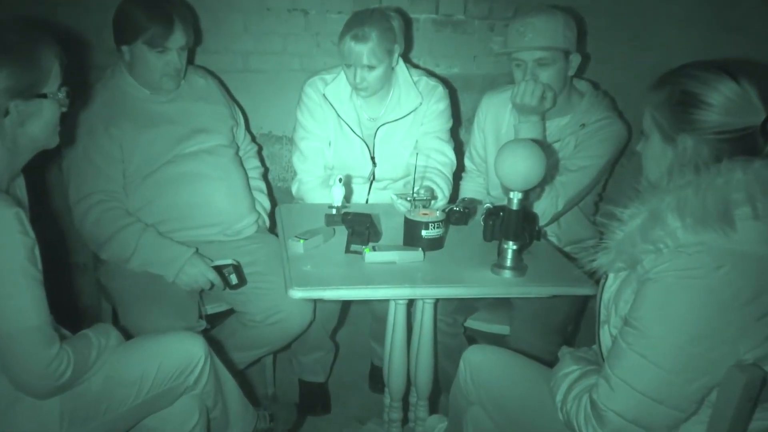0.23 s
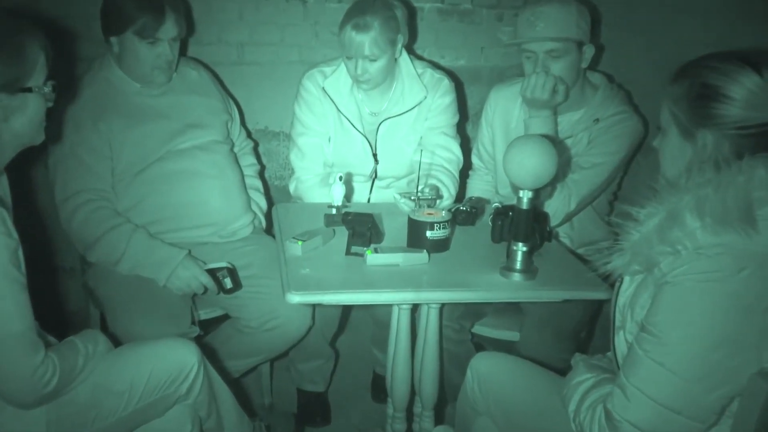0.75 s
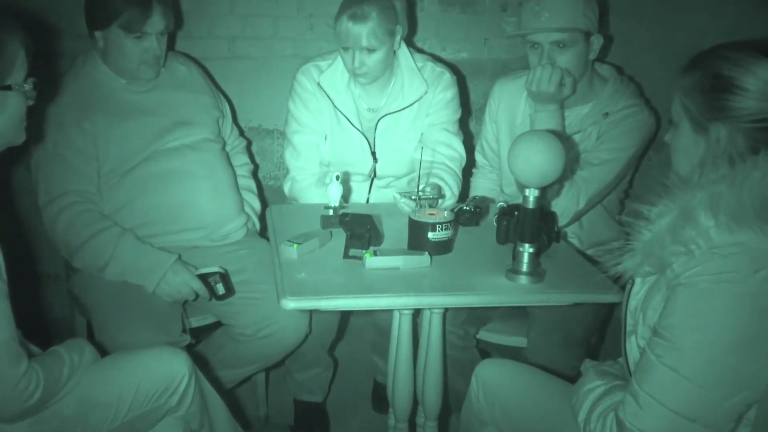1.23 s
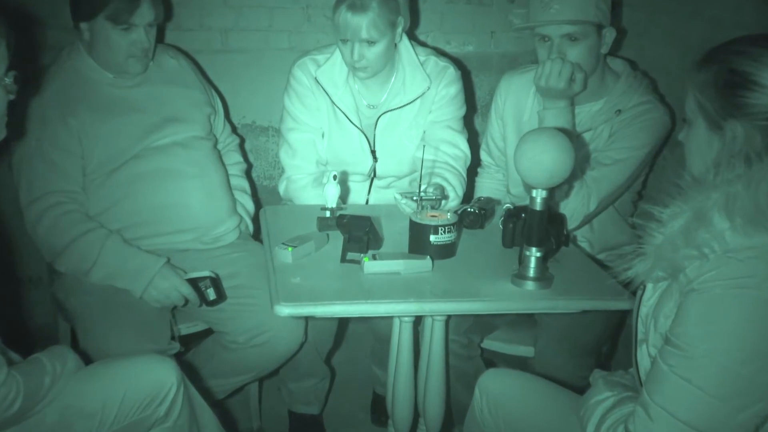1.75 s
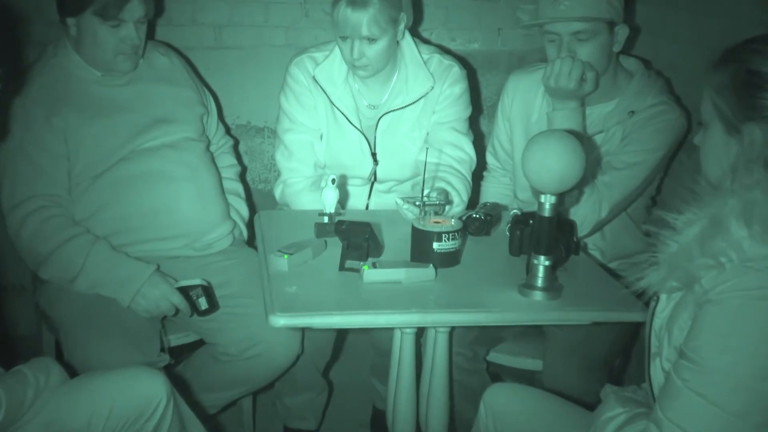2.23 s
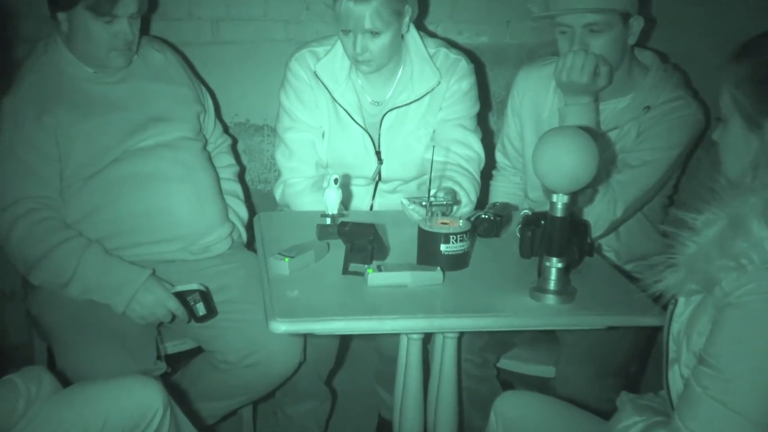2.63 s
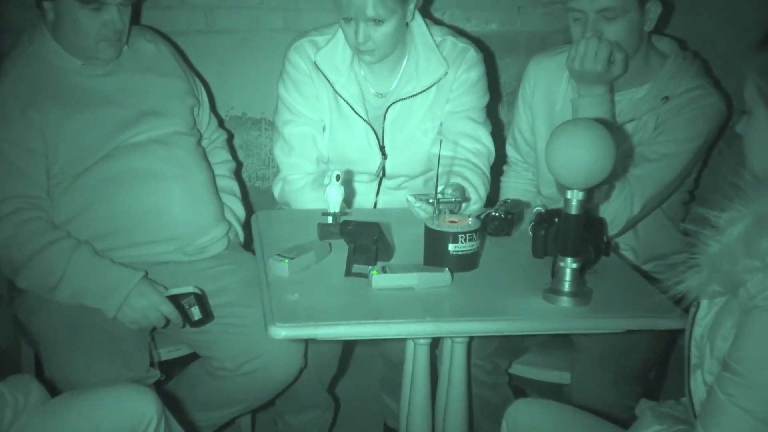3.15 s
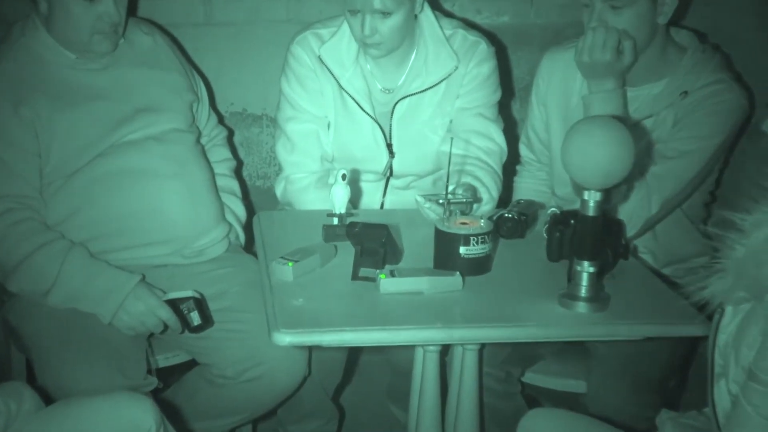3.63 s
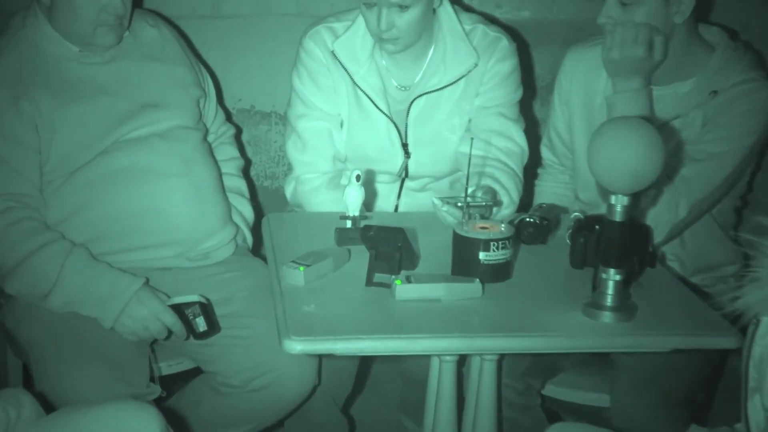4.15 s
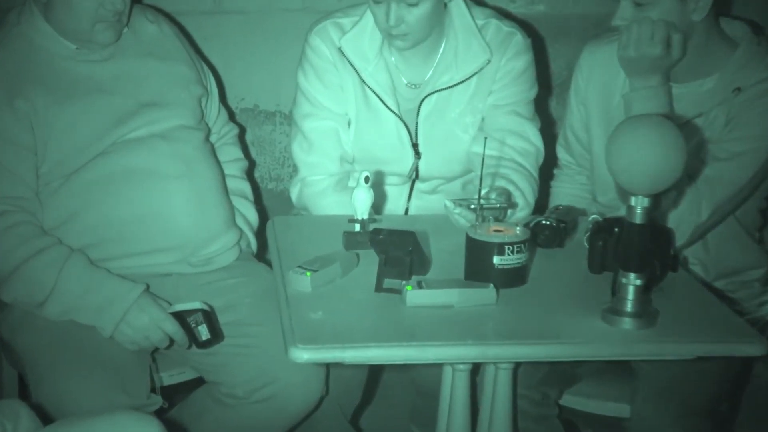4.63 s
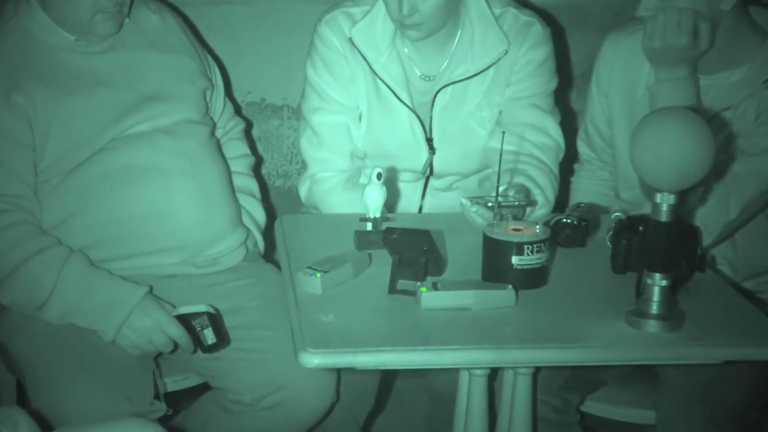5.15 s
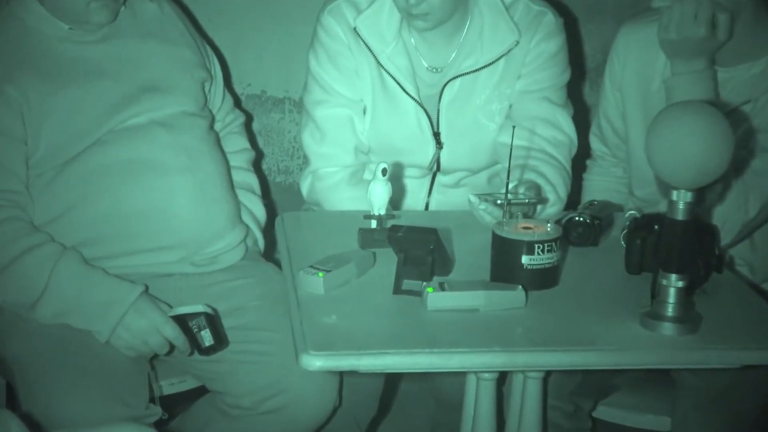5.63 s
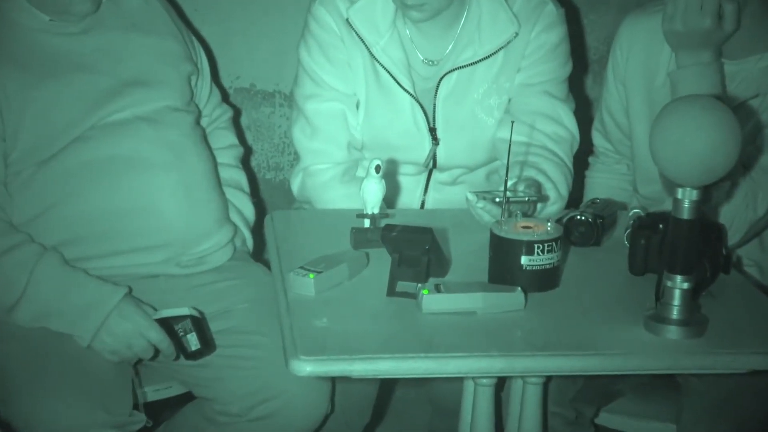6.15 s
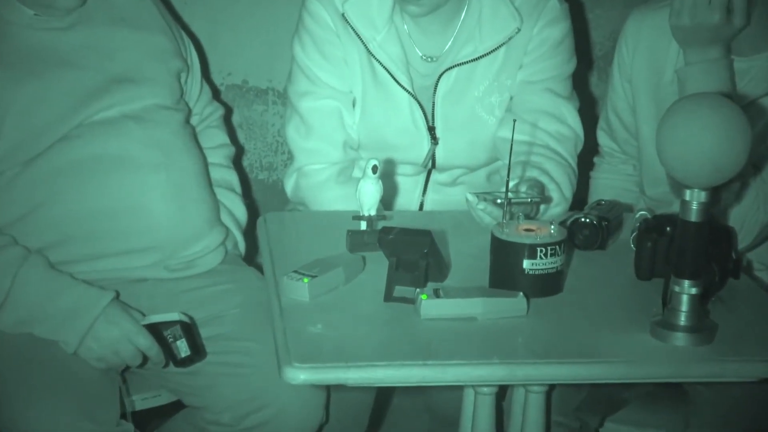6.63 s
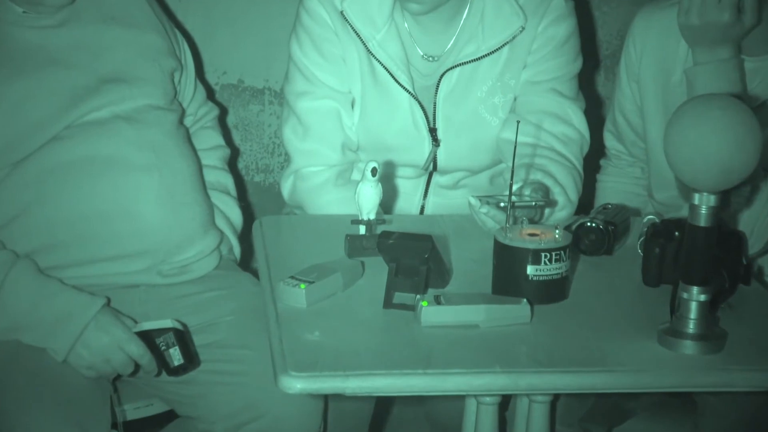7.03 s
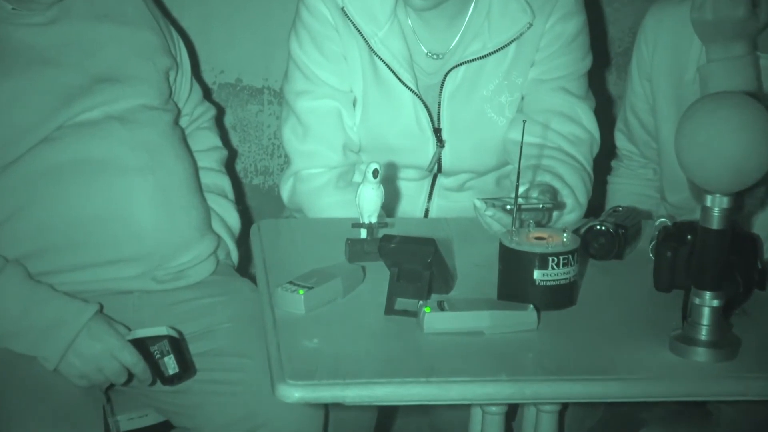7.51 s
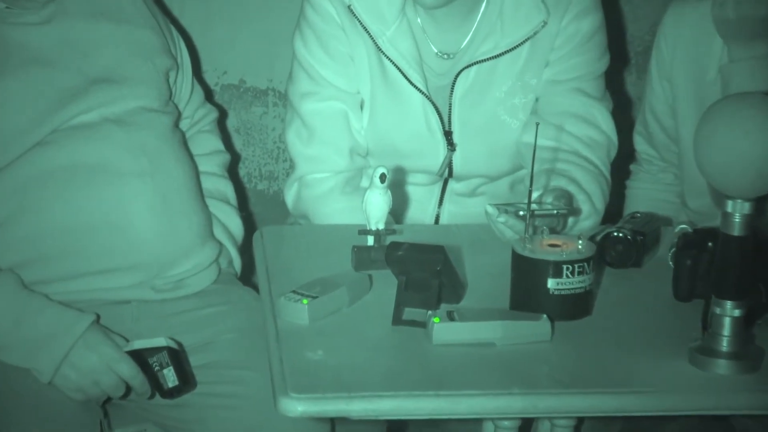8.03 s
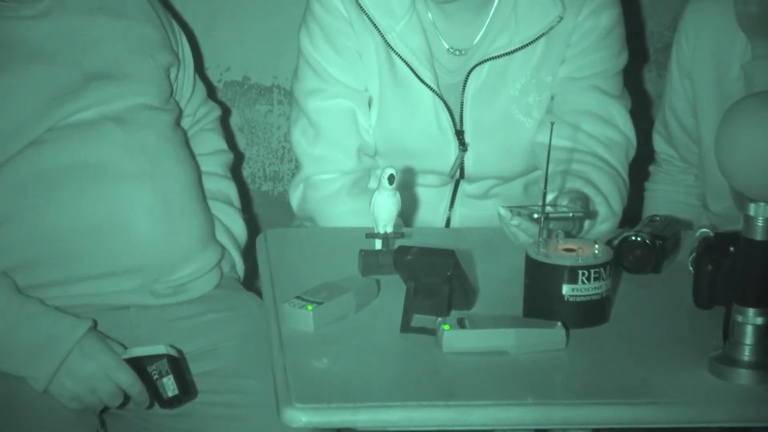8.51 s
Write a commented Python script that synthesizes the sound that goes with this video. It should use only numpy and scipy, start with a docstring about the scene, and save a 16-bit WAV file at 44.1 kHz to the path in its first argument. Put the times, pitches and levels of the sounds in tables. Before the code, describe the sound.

Low hum, rumble and thin hiss fill a small room, broken by a brief descending squeak and a single sharp click.

```python
"""Click in a quiet cellar

Mains hum and a distant motor drone sit on a low rumble that gathers in the room's modes, under thin
microphone hiss. Something small sticks and slips in one falling squeak, then a sharp plastic click
snaps close by. These and a few faint ticks echo off the near walls; a sleeve brushes softly."""
import sys
import numpy as np
from scipy import signal
from scipy.fft import rfft, irfft
from scipy.io import wavfile

SR = 44100
rng = np.random.default_rng(int(sys.argv[2]) if len(sys.argv) > 2 else 0)


def to_wav(sig):
    """Store sig (one row per channel, or 1-D mono) as 16-bit WAV at the path in sys.argv[1].

    Samples outside -1..1 are clipped; the rate is SR.
    """
    pcm = np.clip(np.atleast_2d(sig), -1, 1) * 32767
    pcm = np.round(pcm).astype(np.int16)
    wavfile.write(sys.argv[1], SR, pcm.T)  # frames by channels


N = 387013

# Stereo width of the air, nearly mono in the bass: freq_hz, side_minus_mid_db
STEREO_WIDTH = [(100, -63), (150, -47), (190, -33), (225, -27), (260, -18), (320, -16.5), (450, -9),
                (700, -8.5), (1150, -5.5), (1500, -1), (3000, -0.4), (6000, -4.5), (10000, -7),
                (13000, -25)]
# Colour of the microphone hiss: freq_hz, density_db_per_hz
HISS_SPECTRUM = [(100, -112), (3000, -112), (6000, -112.5), (11000, -114), (15500, -116.5)]
# Slow fader ride on the hiss: time_s, gain_db
HISS_RIDE = [(0, 0.5), (1, -0.3), (4, 0.5), (6.3, -1.2), (7.4, -2), (8.78, -3)]
# Rumble floor between the room modes: freq_hz, density_db_per_hz
RUMBLE_SPECTRUM = [(5, -99), (20, -93), (55, -75), (82, -84), (125, -69), (170, -73.5), (240, -77),
                   (275, -81), (360, -85), (450, -90), (850, -90.5), (1000, -99), (1700, -103),
                   (3000, -114), (9000, -130)]
# Room modes that the rumble excites: centre_hz, half_width_hz, peak_db_per_hz
ROOM_RESONANCES = [(12.8, 9, -68.5), (65.6, 2.1, -59.5), (101.4, 2.9, -59), (108.8, 5.2, -57),
                   (143.7, 5.8, -66.5), (181, 5.8, -71.5), (315.7, 14.3, -79.5), (543.4, 25, -87.5),
                   (704, 18, -88.5), (1114, 97, -93), (1194, 39, -95.5)]
# Slow swell shared by rumble and hum: time_s, gain_db
BED_SWELL = [(0, 2.5), (1.2, 0), (2.1, 1), (4.3, 0.44), (5.8, 0.4), (6.3, -0.65), (7.4, -1), (8.78, -3)]
# Steady machinery tones and a thin electronic whine: pitch_hz, level_db
MACHINE_TONES = [(41.7, -57), (160.8, -59), (199.5, -58.5), (220.7, -53.5), (242.2, -68.5), (277.9, -72.5),
                 (299.1, -70.5), (384.6, -70.5), (528, -77.5), (2950, -90.5)]
# Decay of the wall reflections: freq_hz, t60_s
WALL_DECAY = [(200, 0.23), (1500, 0.18), (6000, 0.13), (14000, 0.053)]
# Colour of rubbing cloth: freq_hz, relative_db
CLOTH_COLOUR = [(700, -7), (2000, 7), (3500, 1.5), (7000, 3), (11000, -3.5), (15500, -11)]
# Strokes of a sleeve against cloth: start_s, rise_s, fade_s, peak_db
SLEEVE_STROKES = [(4.32, 0.057, 0.16, -64.5), (4.44, 0.19, 0.1, -64), (6.78, 0.37, 0.66, -69.5)]
# Faint ticks: start_s, level_db, ring_hz, half_width_hz, t60_s
TICK_CUES = [(2.487, -54.5, 9500, 3000, .012), (2.495, -69, 11000, 3000, 0.1), (2.760, -58, 2300, 900, .04),
             (3.650, -60, 6800, 500, .014), (3.858, -63.5, 10200, 800, 0.07), (3.860, -63, 4540, 700, .06)]
# Overtone recipe of the squeak: harmonic_number, relative_db
SQUEAL_HARMONICS = [(1, -0.5), (2, -8.5), (3, -17), (4, -19)]
# The squeak and a weaker vibration in its middle:
# start_s, length_s, first_hz, last_hz, peak_db, peak_position (0-1), final_roughness
SQUEAL_CUES = [(2.639, .13, 3653, 1450, -52, 0.44, 1.2), (2.683, 0.038, 4500, 3900, -68, 1, .1)]
# Ringing modes of the plastic: pitch_hz, level_db, t60_s
PLASTIC_MODES = [(302, -46, .06), (690, -41, 0.016), (890, -38.5, 0.032), (1126, -29, 0.027),
                 (1560, -34, 0.021), (2000, -42.5, 0.027), (2460, -27.5, 0.0072), (4870, -35, 0.0072),
                 (6030, -27, 0.0049), (6900, -21.5, 0.0042), (7750, -25.5, 0.0054), (10900, -15, 0.0028)]
# Colour of the click's crack: freq_hz, relative_db
CRACK_COLOUR = [(300, -6), (850, 7), (2000, 6), (3600, -2), (6500, 2), (9000, 2), (11000, -1), (13500, 0),
                (15500, -5)]
# How the click leans between the ears: freq_hz, left_minus_right_db
CLICK_BALANCE = [(500, 3), (1400, 5), (2800, 3), (6000, 10.5), (9500, -3.5)]

BINS_HZ = np.fft.rfftfreq(N, 1 / SR)


def gain_of(db):
    """Decibels to amplitude."""
    return 10 ** (np.asarray(db) / 20)


def unit_rms(x):
    """Scales to rms 1."""
    return x / np.sqrt(np.mean(x ** 2) + 1e-20)


def decay(t, t60_s):
    """An envelope that falls 60 dB every t60_s."""
    return np.exp(-np.log(1000) * t / t60_s)


def curve_at(points, hz):
    """Reads a curve on a log-frequency axis."""
    points_hz, values = np.transpose(points)
    return np.interp(np.log(hz + 1), np.log(points_hz + 1), values)


def envelope(points):
    """Joins timed breakpoints with straight lines across the scene."""
    return np.interp(np.arange(N) / SR, *np.transpose(points))


def add(mix, start_s, sound):
    """Drops a sound into the mix at its cue."""
    part = mix[round(start_s * SR):][:len(sound)]
    part += sound[:len(part)]


def pan(x, pan_db):
    """Leans a sound left (positive) or right, by one value or one per frequency."""
    return irfft(rfft(x) * gain_of(np.array([[1], [-1]]) * pan_db / 2), N)


def drift(rate_hz):
    """A smooth random wander of rms 1, moving at up to about rate_hz."""
    return unit_rms(irfft(rfft(rng.standard_normal(N)) * np.exp(-(BINS_HZ / rate_hz) ** 2), N))


def diffuse_noise(density):
    """Stereo noise, centred in the bass; density is the mid's amplitude per root Hz."""
    mid, side = rfft(rng.standard_normal((2, N))) * density * np.sqrt(SR / 2)
    side *= gain_of(curve_at(STEREO_WIDTH, BINS_HZ))
    return irfft(np.array([mid + side, mid - side]), N)


def microphone_hiss():
    """Thin, even hiss that sinks a little with time."""
    return diffuse_noise(gain_of(curve_at(HISS_SPECTRUM, BINS_HZ))) * gain_of(envelope(HISS_RIDE))


def room_rumble():
    """Distant machine noise, lifted at each room mode, swelling slowly."""
    power = gain_of(curve_at(RUMBLE_SPECTRUM, BINS_HZ)) ** 2
    for centre_hz, half_width_hz, db in ROOM_RESONANCES:
        power += (gain_of(db) / (1 + ((BINS_HZ - centre_hz) / half_width_hz) ** 2)) ** 2
    return diffuse_noise(np.sqrt(power)) * gain_of(envelope(BED_SWELL))


def machine_hum(mains_hz=99.7, mains_db=-46, mains_waver_db=1.15, waver_db=0.78, sway_rad=0.12):
    """Wavering mains and motor tones; the mains throbs by beating with the rumble in nearby modes."""
    rad_per_hz = 2 * np.pi * np.arange(N) / SR
    swell_db = envelope(BED_SWELL)
    mains_gain = gain_of(mains_db + swell_db + mains_waver_db * drift(0.93))
    out = mains_gain * np.sin(mains_hz * rad_per_hz + sway_rad * drift(1.8))
    for hz, db in MACHINE_TONES:
        phase = 2 * np.pi * rng.random() + sway_rad * drift(1.6)
        out += gain_of(db + swell_db + waver_db * drift(1.8)) * np.sin(hz * rad_per_hz + phase)
    return np.sqrt(2) * out  # the tone levels are rms


def cellar_echoes(send):
    """Dense reflections from the near walls, the treble dying first."""
    taps = rng.standard_normal((2, SR // 2)) * (rng.random((2, SR // 2)) < .1)
    taps[:, :SR // 250] = 0  # 4 ms pre-delay
    hz, t, bands = signal.stft(taps, SR, nperseg=256)
    tail = signal.istft(bands * decay(t, curve_at(WALL_DECAY, hz)[:, None]), SR, nperseg=256)[1]
    return signal.fftconvolve(send[None], tail / np.linalg.norm(tail[0]), axes=1)[:, :N]


def sleeve(grain_db=2, grain_hz=250):
    """Fibres catch and slip: a soft, grainy brush that rises and fades with each stroke."""
    fibres = unit_rms(diffuse_noise(gain_of(curve_at(CLOTH_COLOUR, BINS_HZ))))
    strokes = sum(envelope([(start, 0), (start + rise, gain_of(db)), (start + rise + fade, 0)])
                  for start, rise, fade, db in SLEEVE_STROKES)
    return fibres * strokes * gain_of(grain_db * drift(grain_hz))


def ticks(raw_gain=0.58):
    """Tiny noise bursts, each coloured by one resonance."""
    t, out = np.arange(SR // 10) / SR, np.zeros(N)
    hz = np.fft.rfftfreq(len(t), 1 / SR)
    for start_s, db, ring_hz, half_width_hz, t60_s in TICK_CUES:
        burst = rng.standard_normal(len(t))
        ring = unit_rms(irfft(rfft(burst) / (1 + ((hz - ring_hz) / half_width_hz) ** 2), len(t)))
        add(out, start_s, gain_of(db) * decay(t, t60_s) * (ring + raw_gain * burst))
    return out


def squeal(length_s, first_hz, last_hz, peak_db, peak_position, final_roughness,
           grip_db=-4.5, release_db=-21, flutter_db=4.5, dulling_db=-14, rasp_db=-1):
    """Stick-slip: as the slide slows, the pitch falls ever faster and the tone breaks into a rasp."""
    progress = np.arange(0, length_s, 1 / SR) / length_s
    n = len(progress)
    roughness = final_roughness * progress ** 2.16
    contact = unit_rms(drift(rate_hz=70)[:n])  # uneven contact shakes level and pitch
    glide_hz = first_hz + (last_hz - first_hz) * progress ** 1.5
    jitter = 0.297 * roughness ** 2 * drift(rate_hz=700)[:n]
    phase = 2 * np.pi * np.cumsum(glide_hz * (1 + 0.009 * contact) * (1 + jitter)) / SR
    # Uneven slips smear the upper partials and lose them to noise.
    smear_rad = 0.56 * unit_rms(drift(rate_hz=450)[:n])
    tone = np.zeros(n)
    for harmonic, db in SQUEAL_HARMONICS:
        gain = gain_of(db + dulling_db * roughness * (harmonic > 1))
        tone += gain * np.sin(harmonic * phase + (harmonic - 1) * smear_rad)
    rasp = gain_of(rasp_db) * roughness ** 2 * (1 + np.cos(phase)) * rng.standard_normal(n)
    arc_db = np.interp(progress, [0, peak_position, 1], [grip_db, 0, release_db])
    level_db = peak_db + arc_db + flutter_db * contact
    return gain_of(level_db) * (unit_rms(tone) + rasp) * signal.windows.tukey(n, .04)


def squeak():
    """Two overlapping squeals that read as one short, falling squeak."""
    out = np.zeros(N)
    for start_s, *shape in SQUEAL_CUES:
        add(out, start_s, squeal(*shape))
    return out


def plastic_click(start_s=3.5872, crack_db=-26, snap_t60_s=0.0113, attack_s=.0001):
    """One snap, a quick run of tiny fractures, rings the plastic's modes over a broadband crack."""
    t, out = np.arange(SR // 10) / SR, np.zeros(N)
    ring = rfft(sum((-1) ** k * gain_of(db) * decay(t, t60_s) * np.sin(2 * np.pi * hz * t)
                    for k, (hz, db, t60_s) in enumerate(PLASTIC_MODES)))
    snap = rfft(rng.standard_normal(len(t)) * decay(t, snap_t60_s))
    colour = unit_rms(gain_of(curve_at(CRACK_COLOUR, np.fft.rfftfreq(len(t), 1 / SR))))
    crack = gain_of(crack_db) * colour * np.sqrt(SR / 1000)  # the energy of 1 ms at crack_db
    magnitude = np.hypot(abs(ring), crack)  # ring and crack add in power
    phase = np.angle(ring + crack * snap / abs(snap))
    hit = irfft(magnitude * np.exp(1j * phase), len(t))
    attack = 1 - np.exp(-t / attack_s)
    fade = np.cos(np.pi / 2 * t / t[-1]) ** 2
    add(out, start_s, hit * attack * fade)
    return out


def scene(small_send_db=-6, click_send_db=-19.0):
    """Over the steady bed, squeak and ticks sit back in the room; the click is close and nearly dry."""
    small_sounds, click = squeak() + ticks(), plastic_click()
    echoes = cellar_echoes(gain_of(small_send_db) * small_sounds + gain_of(click_send_db) * click)
    direct = pan(small_sounds, pan_db=-1.5) + pan(click, curve_at(CLICK_BALANCE, BINS_HZ))
    bed = machine_hum() + room_rumble() + microphone_hiss()
    return bed + sleeve() + direct + echoes


def record(dry):
    """A steep high cut takes the top air off the mix."""
    cutoff_hz = 15550
    lowpass = signal.firwin(511, cutoff_hz, window=("kaiser", 9), fs=SR)
    return signal.oaconvolve(dry, lowpass[None], "same")


dry = scene()
out = record(dry)
to_wav(out)
```